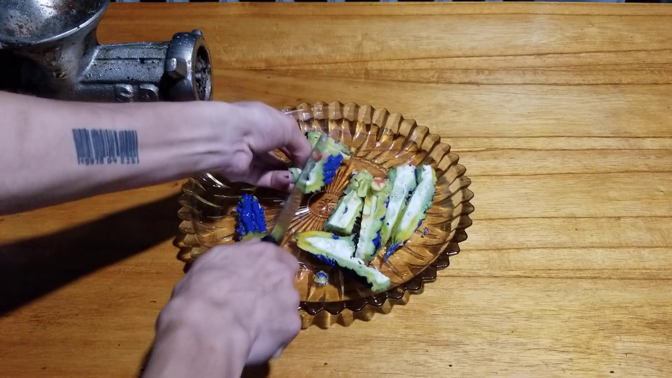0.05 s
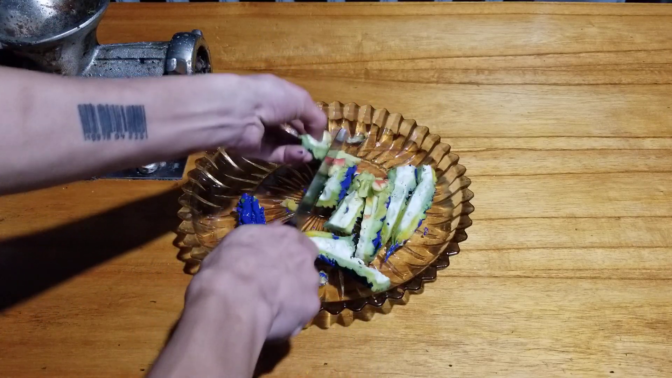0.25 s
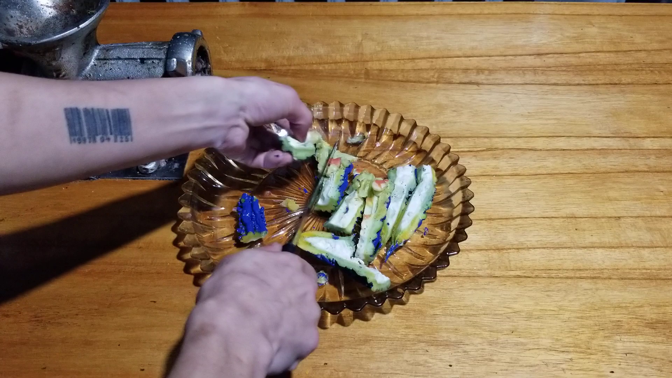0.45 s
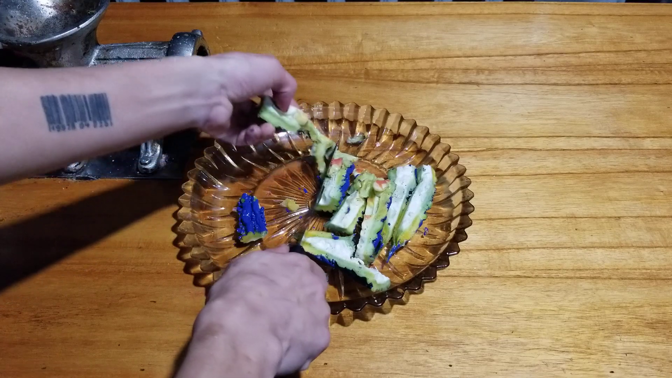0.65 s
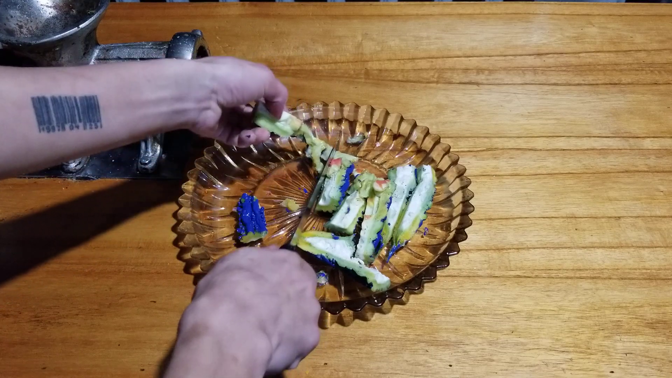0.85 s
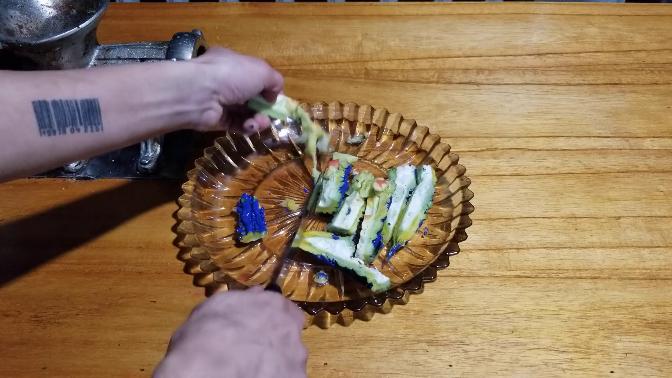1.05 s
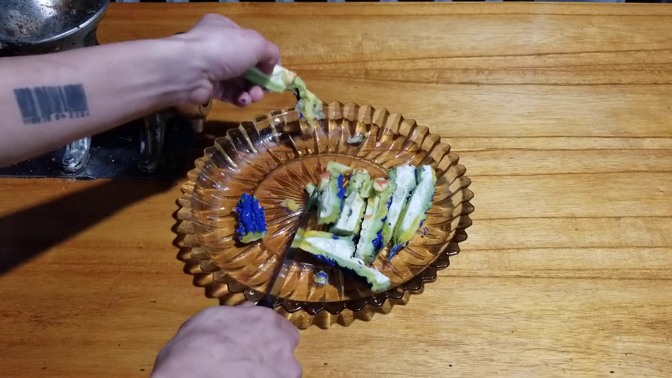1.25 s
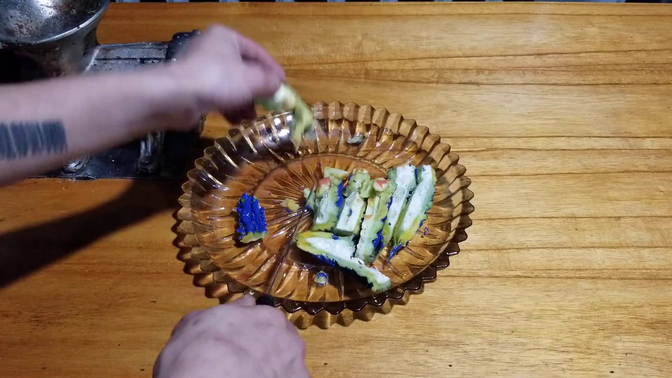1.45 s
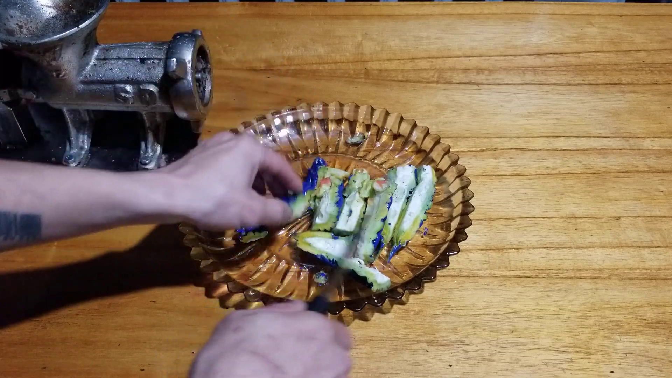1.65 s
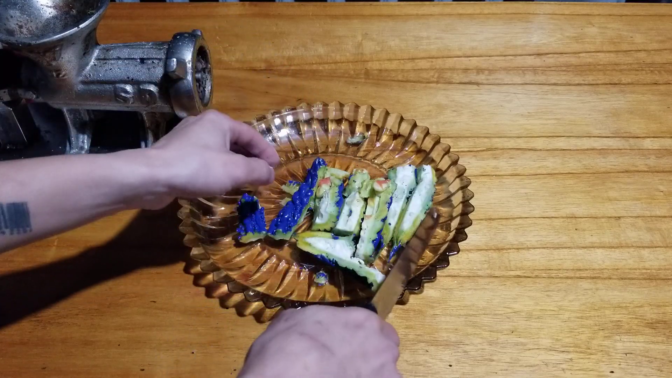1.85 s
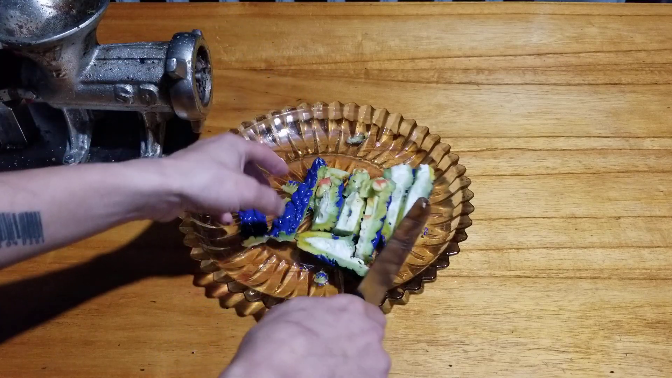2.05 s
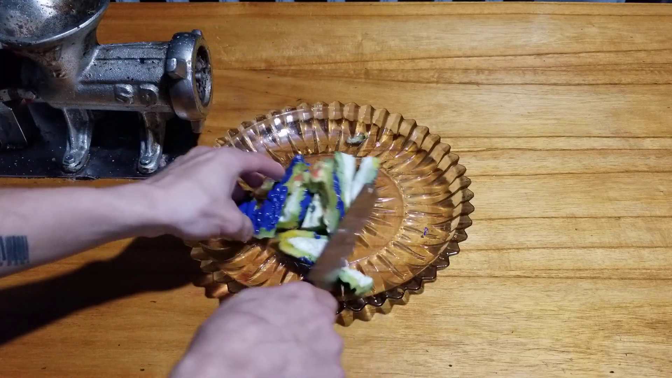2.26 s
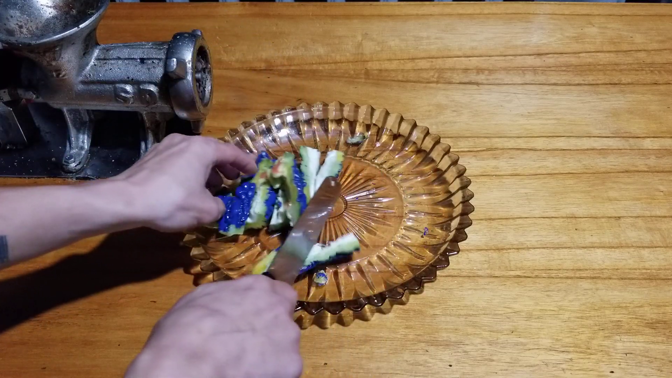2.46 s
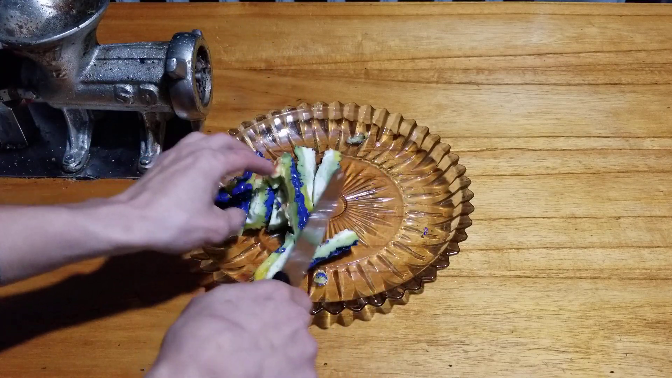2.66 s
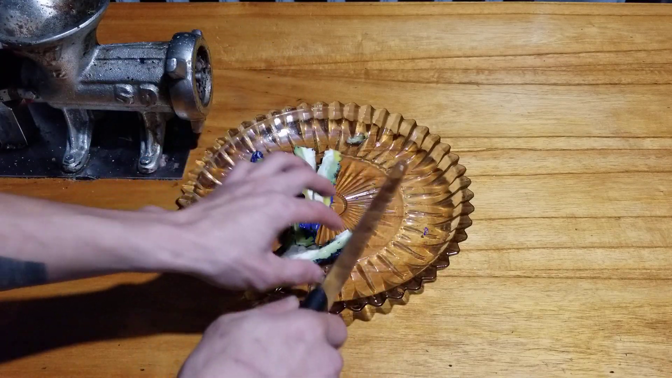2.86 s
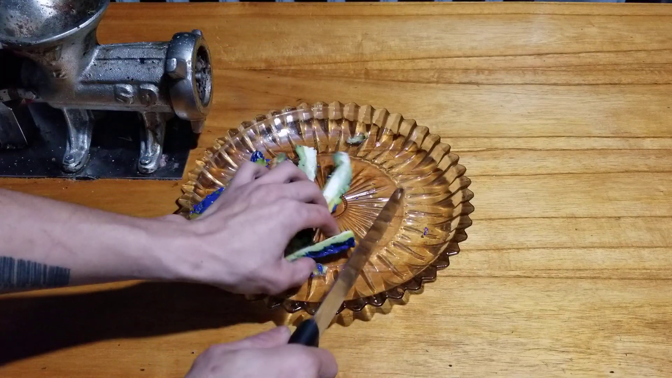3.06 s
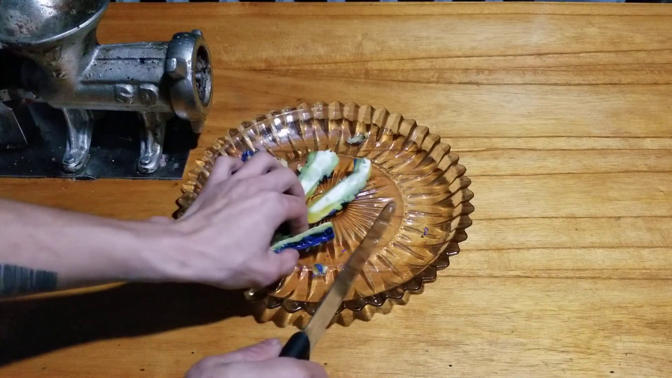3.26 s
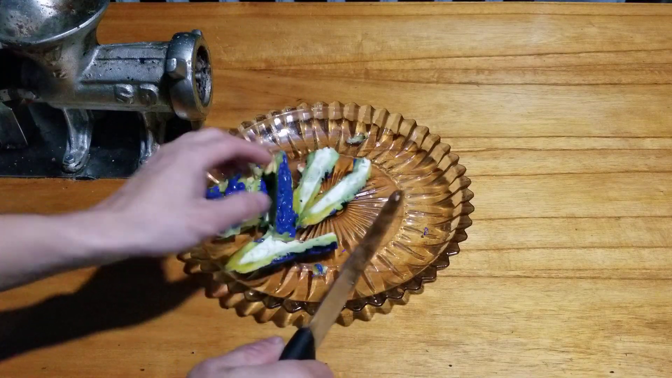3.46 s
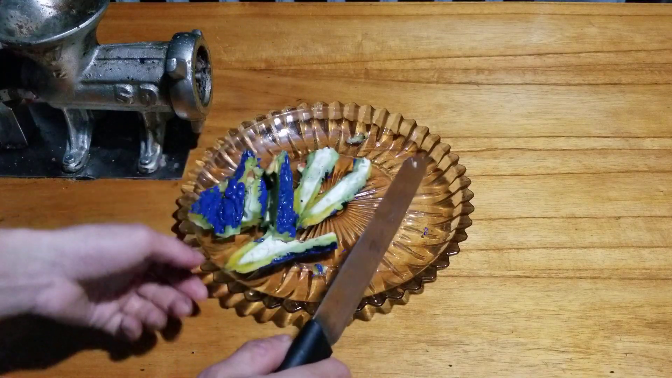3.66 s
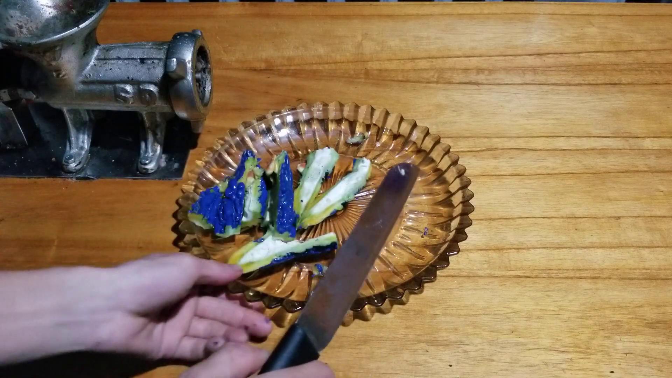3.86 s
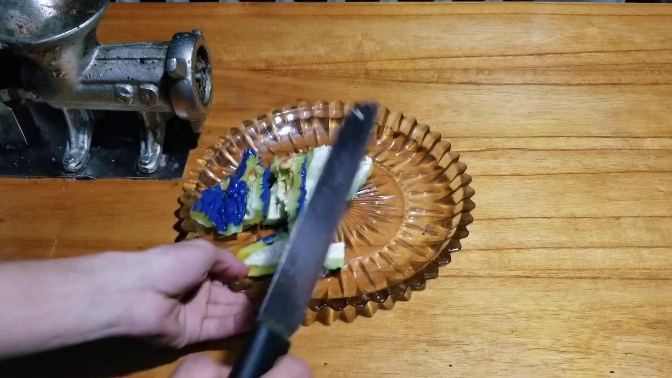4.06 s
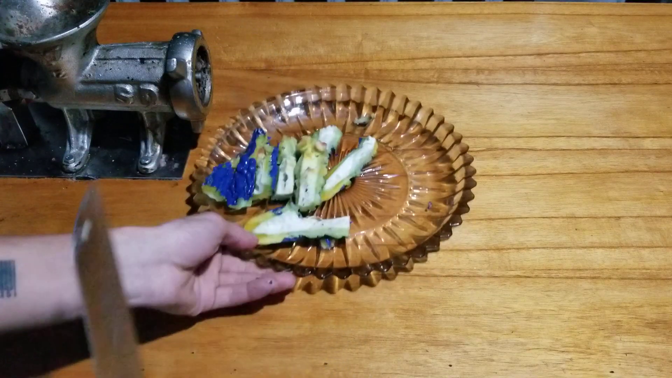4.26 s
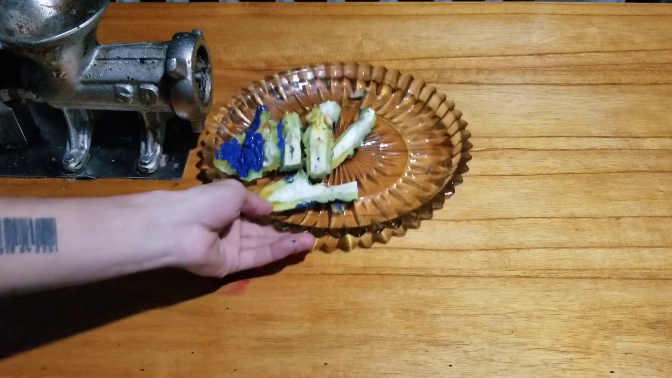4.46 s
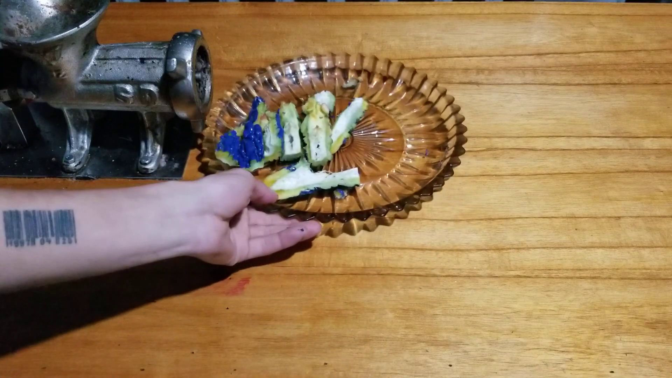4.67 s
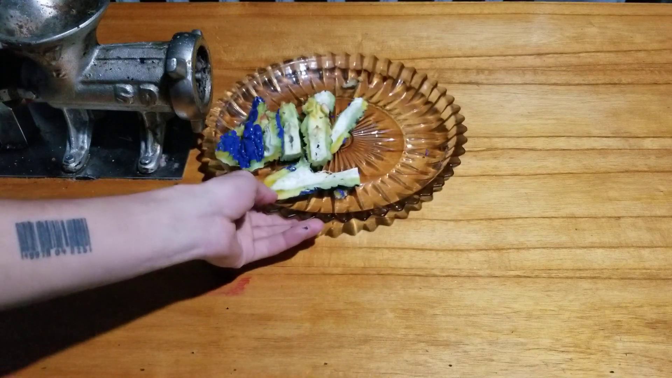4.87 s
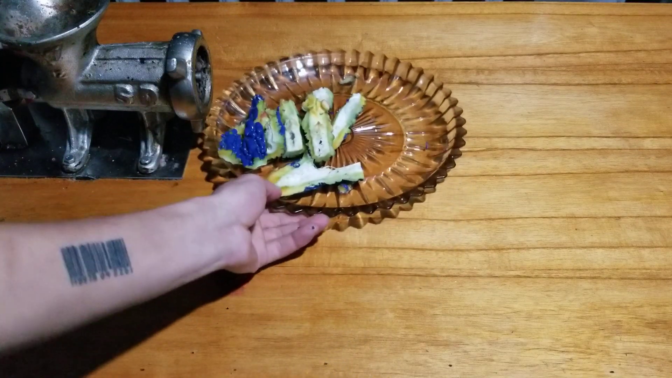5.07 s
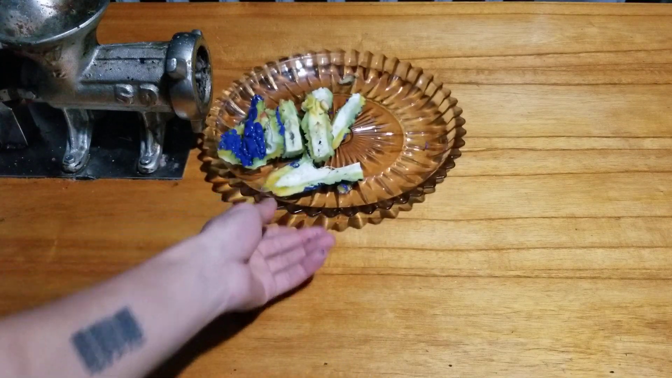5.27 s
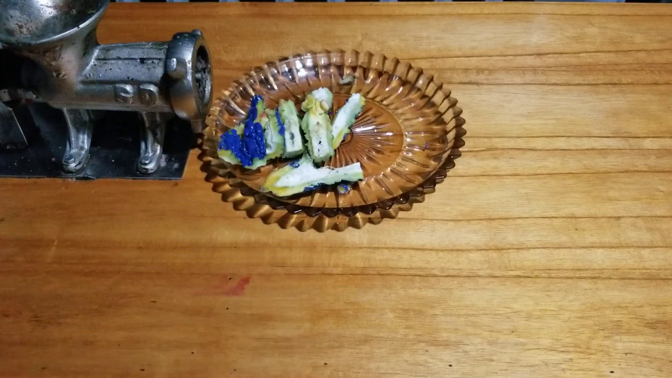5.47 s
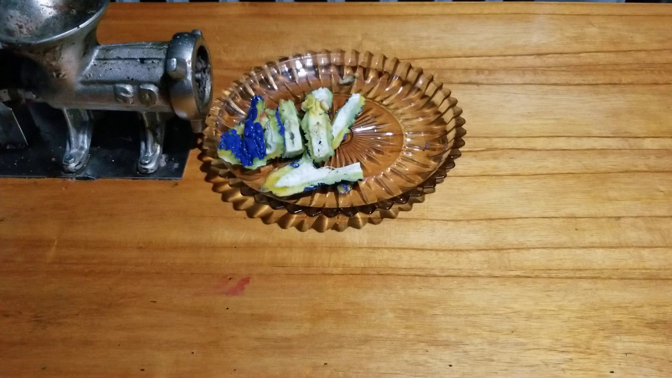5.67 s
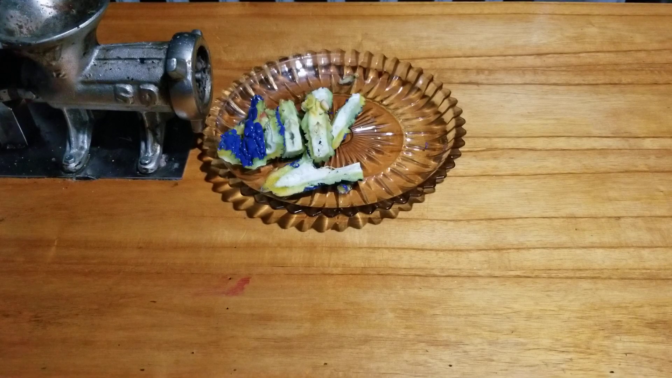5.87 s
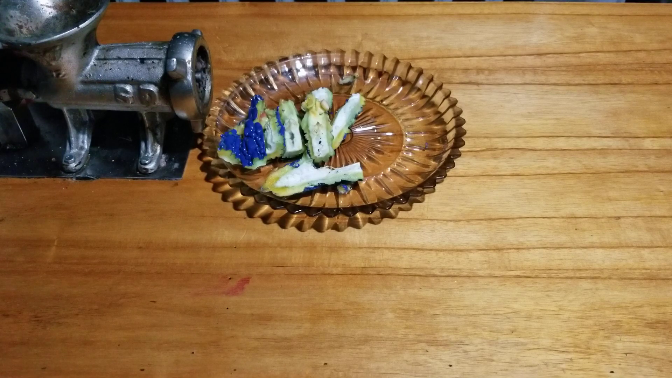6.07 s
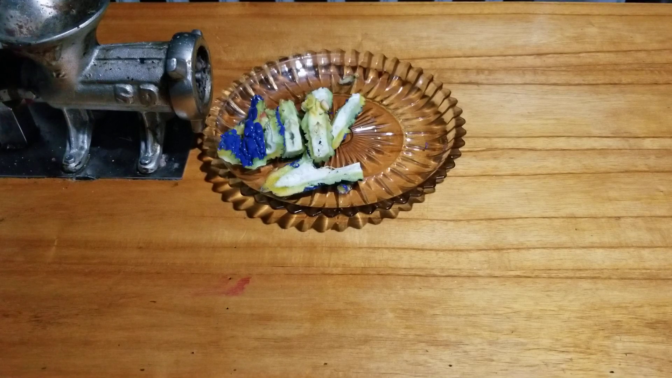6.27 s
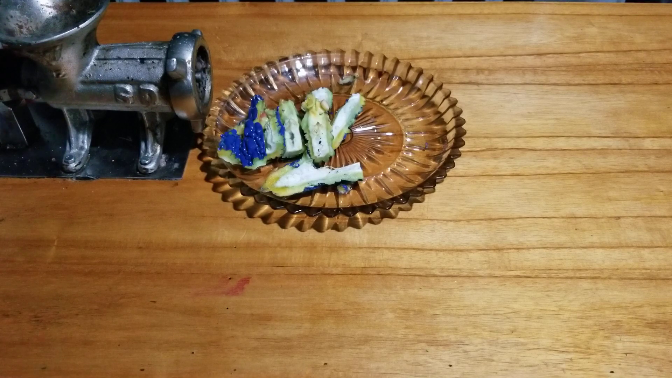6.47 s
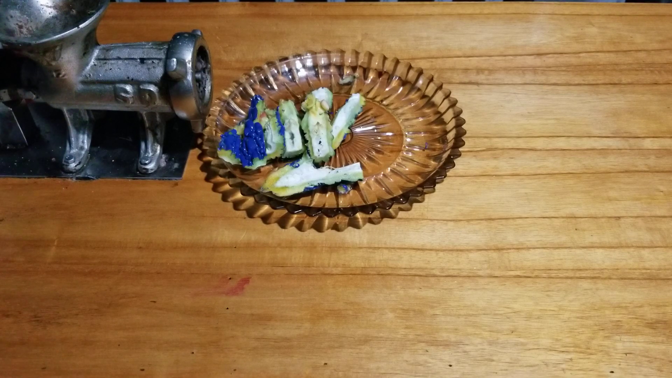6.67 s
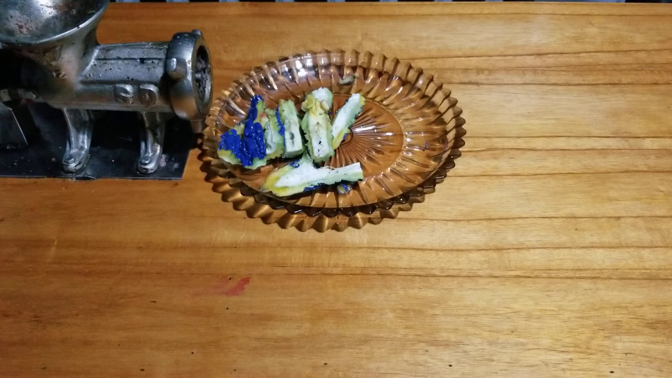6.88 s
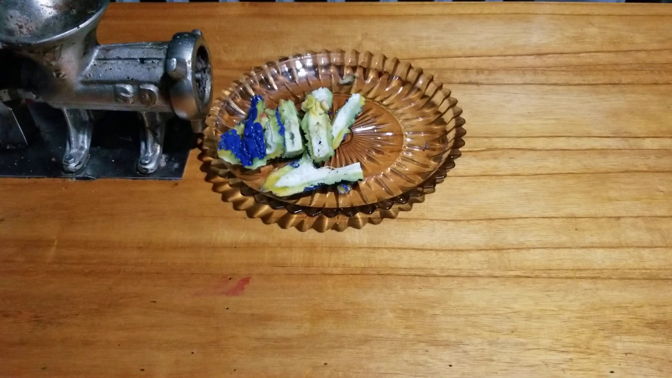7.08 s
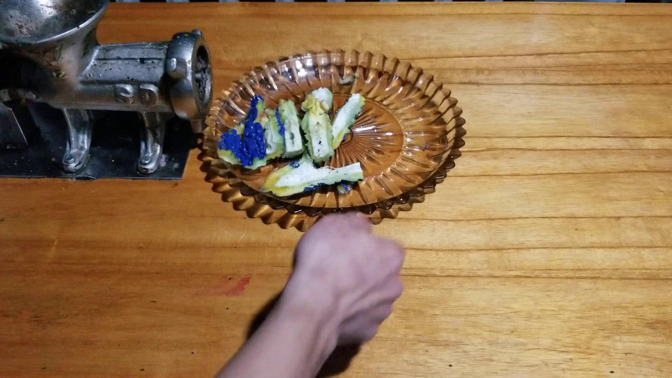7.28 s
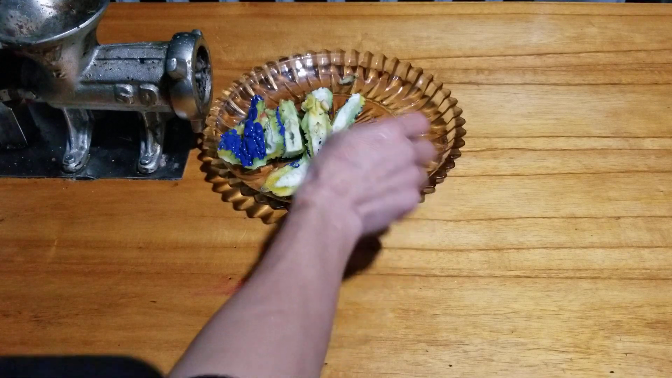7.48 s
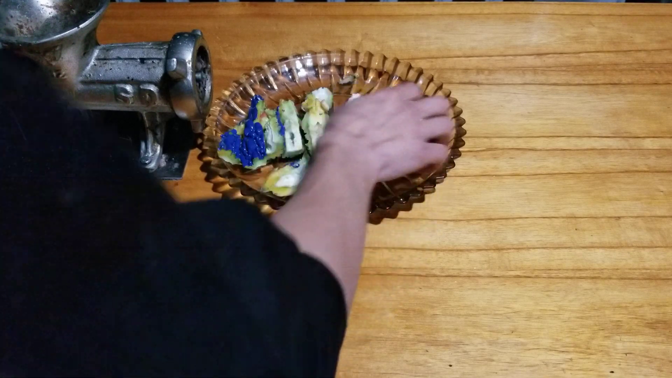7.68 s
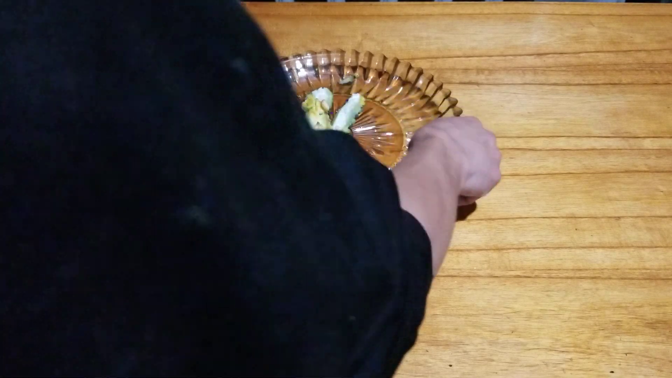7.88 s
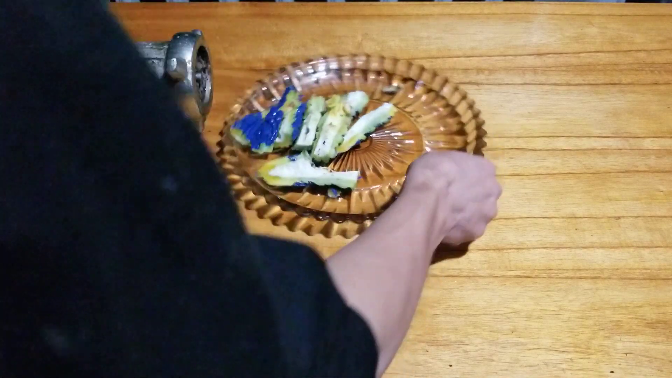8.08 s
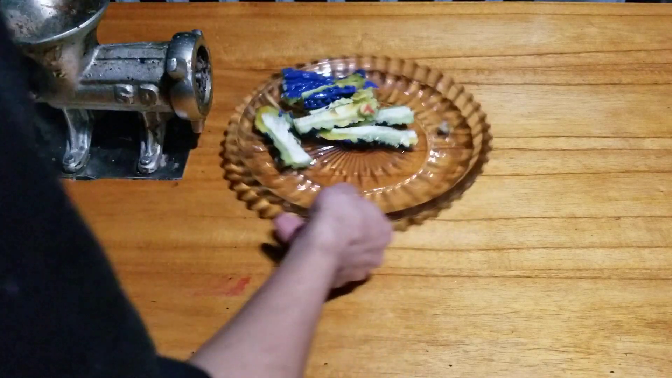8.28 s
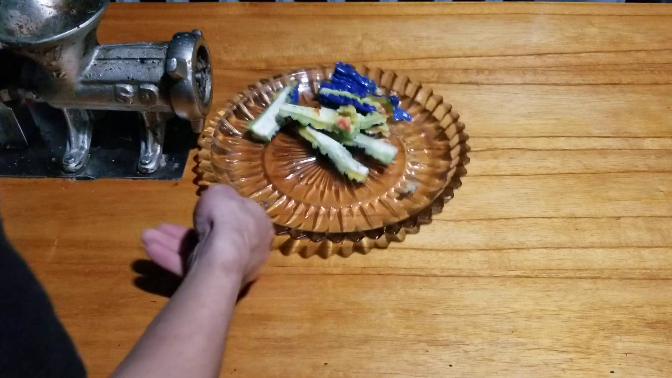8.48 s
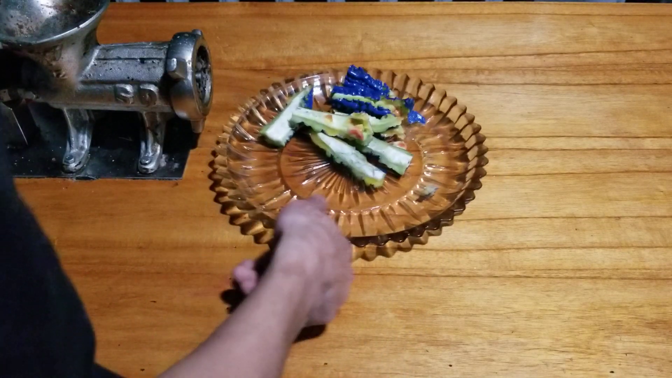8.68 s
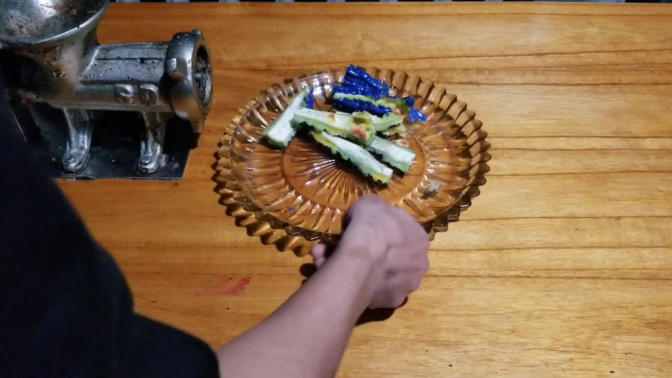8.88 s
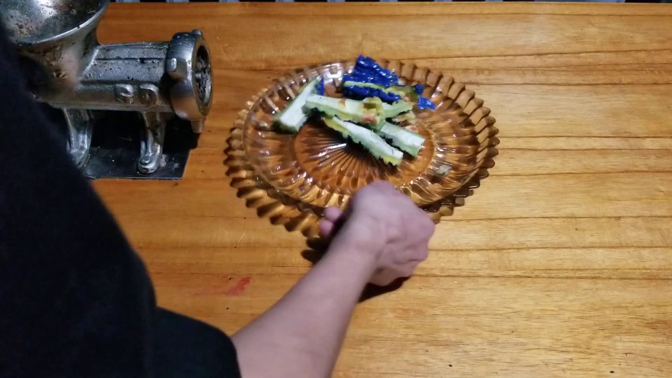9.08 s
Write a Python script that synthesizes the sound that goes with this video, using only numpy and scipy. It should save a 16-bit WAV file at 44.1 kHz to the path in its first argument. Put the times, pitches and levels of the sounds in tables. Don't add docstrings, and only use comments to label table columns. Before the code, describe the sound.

Sharp knock of blade on glass, sparse taps, plate set down, knife laid on wood, then a loud juddering plate slide over a faint fan whirr.

```python
import sys
import numpy as np
from scipy import signal
from scipy.io import wavfile
from scipy.ndimage import uniform_filter1d

SR = 44100
rng = np.random.default_rng(int(sys.argv[2]) if len(sys.argv) > 2 else 0)


def digitize_waveform(pressure):
    field = np.atleast_2d(pressure).T
    bounded = np.clip(field, -1, 1)
    quanta = np.round(bounded * 32767).astype(np.int16)
    wavfile.write(sys.argv[1], SR, quanta)


def volts_from_db(level):
    exponent = np.asarray(level, float) / 20
    return 10 ** exponent


N = 403074

# (frequency [Hz], density [dB per Hz])
WHIRR = [(41, -41.5), (70, -2.5), (113, 2.5), (200, -8.5), (320, -9.5), (800, -7), (1200, -12),
         (1900, -15.5), (3000, -5), (3570, -18), (4400, -18.5), (8200, -28), (9000, -32.5), (16000, -46)]
# (frequency [Hz], width [Hz], level [dB])
WHINES = [(137, 220, -16.5), (2020, 110, -5.5), (2890, 200, -22.5), (4007, 120, -2)]
# (time [s], level [dB])
WHISTLES = [(0.0, -7), (2.05, -6.5), (2.4, -10), (2.9, -9), (3.4, -9.5), (4.4, -3), (5.2, -10.5), (5.9, -6),
            (6.8, -5.5), (7.3, -10), (9.14, -10.5)]
# (time [s], level [dB])
RUMBLE = [(0.0, -64), (1.2, -80.5), (2.0, -66.5), (3.0, -77), (4.5, -76), (5.4, -69), (7.2, -101),
          (8.0, -62.5), (9.14, -79)]
# (frequency [Hz], correlation [1])
LIKENESS = [(60, 1), (150, 0.93), (380, 0.85), (950, -0.14), (2380, 0.14), (5980, -0.12), (15000, -0.03)]
# (frequency [Hz], left over right [dB])
LEAN = [(60, -1), (180, 4.5), (550, 3), (1650, 1.5), (4970, 4.5), (15000, 0)]
# (frequency [Hz], t60 [s])
KITCHEN = [(100, 0.93), (400, 0.29), (1500, 0.37), (4000, 0.35), (10000, 0.26), (16000, 0.36)]

# (time [s], level [dB])
RUSTLE = [(0.0, -65.5), (1.5, -65.5), (3.6, -65.5), (4.2, -63), (4.5, -56.5), (4.76, -62.5), (5.3, -59),
          (5.85, -65.5), (6.2, -56), (6.45, -59), (6.67, -64.5), (6.9, -60), (7.15, -64.5), (7.9, -63.5),
          (8.3, -58), (8.6, -56), (8.75, -75)]
# (frequency [Hz], level [dB])
CLOTH = [(600, -12.5), (1500, 2.5), (3000, 1), (5000, -4.5), (8000, -7), (9000, -15), (13000, -12.5),
         (16000, -26.5)]
# (peak time [s], level [dB], centre [Hz], breadth [octaves], fall [s])
STROKES = [(0.082, -50, 4240, 1.16, 0.054), (1.03, -69, 9000, 4.9, 0.029),
           (1.535, -55.5, 4130, 0.63, 0.049), (1.99, -79, 13000, 0.48, 0.019),
           (2.2, -64, 12800, 3.6, 0.032), (3.22, -74, 10000, 0.77, 0.048), (3.64, -49.5, 960, 0.8, 0.04),
           (3.74, -66, 5470, 0.73, 0.15), (3.8, -54, 1190, 0.41, 0.035), (4.2, -61, 11000, 0.37, 0.02),
           (5.07, -60.5, 7000, 1.4, 0.04), (5.36, -55.5, 5960, 0.49, 0.02), (5.5, -54.5, 447, 1.5, 0.089),
           (5.506, -61, 8750, 14, 0.03), (5.98, -66, 12000, 1.5, 0.038), (6.069, -56.5, 11000, 11, 0.035),
           (6.165, -46, 11900, 5.1, 0.0099), (6.73, -70, 8000, 2.1, 0.037), (7.5, -63.5, 5870, 0.83, 0.034),
           (7.9, -63.5, 6460, 0.55, 0.049), (8.02, -55, 3930, 0.45, 0.054), (8.298, -50, 6500, .2, .01),
           (8.311, -60, 13000, .6, .015), (8.355, -63, 12000, 1, .015), (8.39, -66, 12000, 1, .012),
           (8.412, -58, 11000, .5, 0.011)]

# (time [s], length [s], level [dB], frequency [Hz])
HEAVES = [(4.105, 0.038, -43, 107), (4.157, 0.014, -35, 113), (4.194, 0.051, -29.5, 120),
          (4.283, 0.019, -23, 112), (4.343, 0.022, -27, 121), (4.373, 0.012, -18.5, 128),
          (4.399, 0.025, -23.5, 112), (4.456, 0.016, -23, 130), (4.536, 0.047, -33.5, 118),
          (4.575, 0.051, -21.5, 120.2), (4.629, 0.035, -22.5, 118), (8.048, 0.019, -29, 128),
          (8.078, 0.068, -25, 125.4), (8.138, .02, -20.5, 120), (8.188, 0.017, -15, 124),
          (8.245, 0.055, -12.5, 129), (8.295, 0.073, -11.5, 124), (8.384, .04, -18, 118),
          (8.446, 0.04, -5.5, 109), (8.508, 0.056, -3.5, 116.7), (8.59, 0.16, -26.5, 121.9)]
# (time [s], force [dB])
DRAGS = [
    [(4.04, -58), (4.1, -48), (4.2, -43), (4.27, -51), (4.33, -46), (4.42, -37.5), (4.51, -50), (4.56, -27)],
    [(4.8, -50), (4.86, -66), (4.96, -50), (5.03, -57.5), (5.07, -52.5), (5.15, -72)],
    [(7.9, -51), (8.0, -48.5), (8.1, -38), (8.21, -32.5), (8.3, -19.5), (8.39, -19), (8.43, -28)],
    [(8.46, -12), (8.49, -9), (8.51, -19.5), (8.54, -21), (8.6, -54)],
    [(8.8, -43), (8.88, -67), (8.93, -46), (9.05, -66), (9.1, -44.5), (9.14, -41)],
]
DRAG_BOOM = [-23, 0, -11, -3, 6.5]
# (frequency [Hz], density [dB per Hz])
SCRATCH = [(530, -15), (900, -20), (1120, -13.5), (2170, 1), (2570, -9), (3470, -8), (3860, -14.5),
           (5040, -17), (16000, -39)]

# (frequency [Hz], level [dB], t60 [s])
BOOM = [(88, -30, .1), (108, 0, .24), (124, 0, .22), (150, -12, .08)]
# (frequency [Hz], level [dB], t60 [s])
WOOD = [(228, 0, .25), (276, -3, .09), (311, 2, .1), (347, 3, .09), (388, 1, .08), (432, 2, .06),
        (465, 1, .08), (513, -2, .09), (566, 0, .11), (678, -3, .09), (718, -5, .08), (872, -2, .07),
        (1060, -9, .05), (1268, -7, .06)]
# (frequency [Hz], level [dB], t60 [s])
HANDLE = [(503, 4, 0.15), (573, 14.5, 0.22), (972, -1, 0.44), (1040, 0, 0.17), (1110, -1, 0.22),
          (1430, -6, 0.091), (1960, -8, 0.14), (2200, 8, 0.14), (2720, 2, 0.091)]
# (frequency [Hz], level [dB], t60 [s])
BLADE = [(2110, 6, .06), (2200, 7, 0.1), (3570, 12, 0.044), (2760, 2, 0.055), (4720, 16, .13),
         (5110, 12, .06), (5640, 19, .065)]
# (frequency [Hz], level [dB], t60 [s])
GRIPPED = [(2040, 0, .09), (2200, -4, .07), (2700, 2, .06), (3570, -6, .04), (4000, -9, .04),
           (5350, -7, .06)]
# (frequency [Hz], level [dB], t60 [s])
BLADE_FINE = [(6360, 0, 0.068), (8100, -6, 0.055), (7230, -6, 0.091), (9000, -3, 0.039), (10400, -2, 0.041),
              (11300, -6, 0.18), (11650, 1, 0.044), (13000, 4, 0.03), (13900, -26.5, 0.073),
              (15300, -19, 0.079)]
# (frequency [Hz], t60 [s], level chopped [dB], level tapped on the rim [dB],
# level tapped on a rib [dB], level set down [dB], level slammed [dB])
GLASS = [(1270, .09, -9, -14, -26, -12, 1), (1875, .11, 4, 2, -16, -2, -2), (2135, .17, 1, -14, -2, -3, -2),
         (2620, .12, -12, 0, -7, -14, -6), (2870, .07, -9, -9, -14, -10, -3),
         (3080, .08, -12, 0, -16, 4, 3), (3200, .08, -10, -10, -16, 1, -3),
         (3390, .17, 0, -14, -8, -10, -7), (3640, .07, 2, -14, 2, -5, -1),
         (4300, .08, -12, -18, -20, -6, 0), (4960, .17, 3, -12, -20, -16, -14),
         (5230, .13, 0, -16, -20, -14, -14), (5570, .07, -22, -6, -18, -2, -14),
         (6830, .12, -6, -20, -20, -15, -17)]
# (frequency [Hz], level [dB], t60 [s])
GLASS_FINE = [(5870, -64, 0.052), (6250, -5.5, 0.04), (7180, -5, 0.078), (8125, -2, .08),
              (8740, -4.5, 0.05), (9620, -12, .05), (10400, -10, 0.059), (11700, -2.5, 0.039),
              (13100, -4, 0.043), (14200, -6, 0.07), (15160, -7, 0.034)]

# (time [s], tick [dB], table
# boom [dB], wood knock [dB], knock pitch [Hz])
BUMPS = [(3.7728, -37.5, -70, -27.5, 1460), (3.774, -60, -70, -36, 517), (4.2872, -67, -50, -20.5, 342),
         (4.3982, -47, -50, -27.5, 340), (4.418, -66, -50, -32, 395), (4.4805, -50, -30, -38, 840),
         (5.0968, -62, -70, -44, 1600), (5.972, -70, -60, -39, 278), (7.8194, -55, -70, -32.5, 224),
         (7.8414, -49, -18.5, -19.5, 226), (7.843, -60, -58, -34, 792), (8.014, -44, -50, -30, 353),
         (8.0387, -48, -51, -18, 374), (8.1165, -42, -54, -23, 303), (8.135, -59, -54, -22, 214),
         (8.1845, -43.5, -50, -16, 415), (8.185, -60, -57, -22, 870), (8.205, -63, -58, -10.5, 224),
         (8.2408, -40, -46, -10, 523), (8.2415, -60, -60, -23, 900), (8.262, -60, -53, -8, 318),
         (8.285, -36, -60, -11, 410), (8.318, -60, -57, -13, 290), (8.303, -54, -50.5, -7, 230),
         (8.331, -32, -50, -6.5, 484), (8.349, -45, -53, -7.5, 300), (8.367, -46, -53, -9.5, 514),
         (8.388, -32, -52, -6.5, 314), (8.402, -45, -33.5, -27, 500), (8.62, -48, -48, -28, 283),
         (8.9713, -55, -26, -27, 386)]
# (time [s], tick [dB], table boom [dB], wood knock [dB], knock pitch [Hz])
TICKS = [(3.6179, -50, -58, -49, 516), (4.1882, -36, -50, -25, 326), (4.19, -60, -60, -38, 900),
         (4.738, -52, -73, -70, 300), (5.0748, -39, -58, -65, 250), (8.1632, -46, -70, -39, 302),
         (8.2955, -39, -70, -26, 880), (8.3064, -38, -70, -30, 710), (8.352, -45, -70, -26, 466),
         (8.3712, -46, -68, -30, 845), (8.411, -44, -70, -31, 840)]
# (time [s], blade [dB], table boom [dB], handle knock [dB], knock pitch [Hz])
CLINKS = [
    (5.9645, -31.5, -29, -32, 984),
    (6.045, -60, -56.5, -40, 584),
    (6.101, -64, -60.5, -44, 583),
    (6.166, -50, -50, -33, 1110),
    (6.181, -37, -70, -40, 2200),
]
# (time [s], blade [dB], table boom [dB], wood knock [dB], knock pitch [Hz])
CLATTER = [(6.1414, -45, -35, -24.5, 573), (6.1485, -36.5, -44, -21, 298), (6.2679, -25, -55, -23.5, 640),
           (6.277, -52, -51, -14, 319), (6.283, -42, -25, -18.5, 1360), (6.2988, -23, -19.5, -16.5, 574),
           (6.311, -32, -54, -22.5, 680), (6.331, -53, -48, -26.5, 370)]
# (time [s], blade [dB], table boom [dB], wood knock [dB], knock pitch [Hz])
SLAP = [
    (6.2753, -14, -25.5, -12.5, 1004),
]
# (time [s], glass [dB], table boom [dB], wood knock [dB], knock pitch [Hz])
SET_DOWNS = [
    (4.574, -15.5, -13, -13, 373),
    (4.577, -55, -60, -22, 1180),
    (5.181, -35, -19.5, -25.5, 307),
    (5.183, -56, -60, -38.5, 893),
    (5.184, -60, -60, -32.5, 1280),
]
# (time [s], glass [dB], table boom [dB], wood knock [dB], knock pitch [Hz])
SLAMS = [(8.4441, -3.5, -34, -7.5, 342), (8.456, -7.5, -32, -1.5, 420), (8.468, -10, -34, -6.5, 290),
         (8.482, -26, -33, -13, 470), (8.4996, -6.5, -24, -7, 674), (8.504, -13, -34, -6, 870),
         (8.5149, -11, -32, -4, 297), (8.527, -24, -34, -7, 315), (8.538, -16, -42, -11, 700),
         (8.548, -24, -46, -21, 397), (8.562, -22, -45, -28, 710), (8.585, -27, -45, -28.5, 935)]
# (time [s], glass [dB], table boom [dB], wood knock [dB], knock pitch [Hz])
RIB_TAPS = [
    (0.9992, -41, -42, -41, 370),
    (2.007, -40, -38, -40, 650),
    (2.1614, -28.5, -31, -52, 400),
]
# (time [s], glass [dB], table boom [dB], wood knock [dB], knock pitch [Hz])
RIM_TAPS = [
    (1.8955, -30, -26.5, -30, 482),
    (1.978, -50, -48, -65, 202),
    (2.971, -59, -37.5, -44.5, 276),
]
# (time [s], glass [dB], table boom [dB], wood knock [dB], knock pitch [Hz])
CHOPS = [
    (0.0998, -4, -19, -16, 317),
    (0.106, -37, -49, -18.5, 240),
    (0.108, -47, -60, -26, 780),
]
# (time [s], depth [dB])
DUCKS = [
    (0.1, 6.5),
    (8.45, 2),
]


def evened(x):
    return x / np.sqrt(np.mean(x ** 2) + 1e-20)


def read(points, hz):
    f, value = np.transpose(points)
    return np.interp(np.log(hz + 1), np.log(f + 1), value)


def curve(rows, t):
    s, value = np.transpose(rows)
    return np.interp(t, s, value)


def add(mix, s, sound, pan_db=0):
    part = mix[:, round(s * SR):][:, :len(sound)]
    sides = np.array([[.5], [-.5]])[:len(mix)]
    part += volts_from_db(sides * pan_db) * sound[:part.shape[1]]


def noise(db_field, patchy_db):
    hz = np.fft.rfftfreq(1024, 1 / SR)[:, None]
    t = np.arange(N // 256 + 5) * 256 / SR
    a, b, c, d, patches = rng.standard_normal((len(t), 513, 5)).T
    patches = uniform_filter1d(patches, size=12, axis=0)
    patches = evened(uniform_filter1d(patches, size=8, axis=1))
    same = np.clip(read(LIKENESS, hz), -1, 1)
    left = a + 1j * b
    right = same * left + np.sqrt(1 - same ** 2) * (c + 1j * d)
    balance_db = np.array([.5, -.5])[:, None, None] * read(LEAN, hz)
    z = np.array([left, right]) * volts_from_db(balance_db + db_field(hz, t) + patchy_db * patches)
    return signal.istft(z, nperseg=1024, noverlap=768)[1][:, :N]


def room_noise():
    def field(hz, t):
        whistles = sum(volts_from_db(db + 24.5) ** 2 / (1 + (2 * (hz - f) / width) ** 2) ** 2 for f, width, db in WHINES)
        whirr = volts_from_db(read(WHIRR, hz) - 67.5) ** 2
        whirr = whirr * (1 + whistles * volts_from_db(curve(WHISTLES, t)) ** 2)
        low_pass = 1 / (1 + (hz / 65) ** 8)
        high_pass = (hz ** 2 / (hz ** 2 + 35 ** 2)) ** 2
        hum = 1 + 3.6 / (1 + ((hz - 40) / 8) ** 2)
        rumble = volts_from_db(curve(RUMBLE, t) + 5.0) ** 2 * low_pass * high_pass * hum
        return 10 * np.log10(whirr + rumble + 1e-30)
    return noise(field, 2.42)


def kitchen(x):
    taps = np.zeros((2, SR // 2))
    at = np.arange(160, SR // 2 - 20, 20)
    at = at + rng.integers(0, 20, (2, len(at)))
    np.put_along_axis(taps, at, rng.choice([-1., 1.], at.shape), 1)
    hz, t, z = signal.stft(taps, SR, nperseg=512)
    alike = np.clip(np.log2(1100 / (hz[:, None] + 1)) / 2.16, 0, 1)
    z = alike * z[0] + np.sqrt(1 - alike ** 2) * z
    tail = signal.istft(z * volts_from_db(-60 * t / read(KITCHEN, hz)[:, None]), SR, nperseg=512)[1]
    tail = signal.sosfilt(signal.butter(2, 270, "high", fs=SR, output="sos"), tail)
    return signal.fftconvolve(x.mean(0)[None], tail / np.linalg.norm(tail[0]), axes=1)[:, :N]


def rustle():
    rise_share = 0.34
    def field(hz, t):
        power = volts_from_db(read(CLOTH, hz) + curve(RUSTLE, t)) ** 2
        for s, db, centre_hz, octaves, fall in STROKES:
            rising = ((t - s) / (rise_share * fall)) ** 2
            swell = np.exp(-np.where(t < s, rising, (t - s) / fall))
            band = np.exp(-(np.log2((hz + 1) / centre_hz) / octaves) ** 2)
            power = power + volts_from_db(db) ** 2 * swell * band
        return 10 * np.log10(power) + 2.5 * rng.standard_normal(len(t))
    return volts_from_db(-15.5) * noise(field, 1.5)


def ring(modes, spread_db=0, damping=1.0, near_hz=None):
    hz, db, t60 = np.transpose(modes)[:, :, None]
    t = np.arange(SR // 2) / SR
    luck = rng.standard_normal((2, len(modes), 1))
    db = db + spread_db * luck[0]
    if near_hz:
        db = db - 17.8 * abs(np.log2(hz / near_hz))
    lead = luck[1] * np.minimum(hz / 2500, 1)
    decay = volts_from_db(db - 60 * t / (damping * t60))
    x = (decay * np.sin(2 * np.pi * hz * t + lead)).sum(0)
    return x / abs(x).max()


def crack(low_hz, high_hz, t60):
    t = np.arange(SR // 10) / SR
    band = signal.butter(3, [low_hz, min(high_hz, 20000)], "band", fs=SR, output="sos")
    x = signal.sosfilt(band, rng.standard_normal(len(t)) * volts_from_db(-60 * t / t60))
    return np.pad(x / abs(x).max(), (0, SR // 2 - len(t)))


def heaves():
    rise_s, sag_db, fall_s, lead_s = .009, -7, .011, .012
    out, t = np.zeros((2, N)), np.arange(SR // 4) / SR
    for s, length, db, hz in HEAVES:
        shape = 1 - np.exp(-(t / rise_s) ** 2)
        shape = shape * np.exp(-np.maximum(t - length, 0) / fall_s)
        add(out, s - lead_s, volts_from_db(db + sag_db * t / length) * shape * np.sin(2 * np.pi * hz * t), .6)
    return out


def drags():
    judder_db, grit_db = -4, -17.5
    grit_growth, full_force_db = 1.36, -5
    out = np.zeros((2, N))
    colour = np.roll(np.fft.irfft(volts_from_db(read(SCRATCH, np.fft.rfftfreq(512, 1 / SR)))), 256)
    for rows, boom_db in zip(DRAGS, DRAG_BOOM):
        start = rows[0][0]
        t = np.arange(start, rows[-1][0], 1 / SR)
        force_db = curve(rows, t)
        scratch_db = full_force_db + grit_growth * (force_db - full_force_db) + grit_db
        fade = signal.windows.tukey(len(t), .1)
        slips = (rng.random(len(t)) < 260 / SR) * rng.standard_normal(len(t))
        slips = slips * volts_from_db(rng.exponential(1, len(t)))
        slips = fade * slips / np.sqrt(uniform_filter1d(slips ** 2, size=3000) + 1e-9)
        bunching = 0.33 + 2 * uniform_filter1d(abs(slips), size=150)
        grit = signal.oaconvolve(rng.standard_normal(len(t)) * bunching, colour, "same")
        boom, wood = ring(BOOM, 1, .8), ring(WOOD, 1, .4)
        boom, wood = boom / np.linalg.norm(boom), wood / np.linalg.norm(wood)
        add(out, start, signal.oaconvolve(slips * volts_from_db(force_db + boom_db), boom), .6)
        add(out, start, signal.oaconvolve(slips * volts_from_db(force_db + judder_db), wood), 1.5)
        add(out, start, volts_from_db(scratch_db) * fade * evened(grit), 3.0)
    return out


def hits(rows, body, fine, wood, ring_share, thud_share, damping, pan_db, edge_db, knock_db=-9.0):
    boom_rise_s, wood_rise_s, knock_s = 0.0089, .002, 0.0024
    out = np.zeros((2, N))
    share, thud = np.clip([ring_share, thud_share], .1, .8)
    t = np.arange(SR // 2) / SR
    boom_swing = 1 - np.exp(-t / boom_rise_s)
    wood_swing = 1 - np.exp(-t / wood_rise_s)
    for s, body_db, boom_db, wood_db, knock_hz in rows:
        snap = crack(1100, 3330, .024)
        snap = snap + volts_from_db(edge_db) * crack(5100, 21000, .042)
        snap = snap + volts_from_db(-3) * crack(650, 3800, .004)
        add(out, s, volts_from_db(body_db) * (1 - share) * snap, pan_db)
        for port, side in zip(out, (.5, -.5)):
            tones = ring(body, 1.3, damping) + volts_from_db(edge_db) * ring(fine, 0.67, damping)
            add(port[None], s, share * volts_from_db(body_db + side * pan_db) * tones)
        loaded = np.array(wood) * [1 + .015 * rng.standard_normal(), 1, 1]
        low = (1 - thud) * ring(loaded, 3.8, near_hz=knock_hz)
        low = low + thud * crack(.5 * knock_hz, 2.0 * knock_hz, 0.083)
        pulse = t / knock_s * np.exp(1 - t / knock_s)
        low = low + volts_from_db(knock_db) * pulse * np.sin(2 * np.pi * knock_hz * t)
        boom = volts_from_db(boom_db) * ring(BOOM, 2.5) * boom_swing
        add(out, s, volts_from_db(wood_db) * low * wood_swing + boom, 1.2)
    return out


def bumps_and_ticks():
    ticks = hits(TICKS, BLADE, GLASS_FINE, WOOD, 0.14, 0.33, damping=0.45, pan_db=5, edge_db=-6.5)
    return ticks + hits(BUMPS, BLADE, GLASS_FINE, WOOD, 0.053, 0.29, damping=0.33, pan_db=23.5, edge_db=-26)


def knife():
    out = hits(CLINKS, GRIPPED, BLADE_FINE, HANDLE, 0.8, 0.3, damping=1.0, pan_db=-8.5, edge_db=-8.5,
               knock_db=-19.5)
    out += hits(CLATTER, BLADE, BLADE_FINE, WOOD, 0.67, 0.27, damping=1.0, pan_db=-7.5, edge_db=6.0)
    return out + hits(SLAP, GRIPPED, BLADE_FINE, WOOD, 0.19, .8, damping=.5, pan_db=6, edge_db=-18)


def plate(rows, order, ring_share, damping, thud_share, edge_db):
    modes = np.array(GLASS)[:, [0, 2 + order, 1]]
    twins = modes * [1.011, 1, 1] + [0, -8, 0]
    pairs = np.vstack([modes, twins])
    return hits(rows, pairs, GLASS_FINE, WOOD, ring_share, thud_share, damping, 13.7, edge_db)


def radiate(x):
    return signal.sosfilt(signal.butter(6, 88, "high", fs=SR, output="sos"), x)


def camera_gain_db(t):
    sink_s, hold_s, recover_s = 0.55, 0.46, 0.55
    turns = np.cumsum([0, sink_s, hold_s, recover_s])
    return -sum(depth_db * np.interp(t - s, turns, [0, 1, 1, 0]) for s, depth_db in DUCKS)


def scene():
    background = room_noise() + rustle()
    pushed = drags() + bumps_and_ticks()
    pushed += plate(SLAMS, order=4, ring_share=.55, damping=.4, thud_share=.7, edge_db=-27)
    handled = knife()
    laid = plate(SET_DOWNS, order=3, ring_share=.78, damping=.25, thud_share=.55, edge_db=-30)
    taps = plate(RIB_TAPS, order=2, ring_share=0.88, damping=0.67, thud_share=0.15, edge_db=-8.5)
    taps += plate(RIM_TAPS, order=1, ring_share=0.53, damping=1.0, thud_share=0.46, edge_db=0.5)
    chop = plate(CHOPS, order=0, ring_share=1.0, damping=0.35, thud_share=0.84, edge_db=-17.5)
    echoes = kitchen(chop + taps)
    echoes += kitchen(volts_from_db(-1.5) * pushed + volts_from_db(-2.0) * laid)
    echoes += volts_from_db(-1.0) * kitchen(handled)
    return radiate(chop + taps + laid + pushed + handled + echoes + heaves()) + background


def top_cut(x):
    return signal.sosfilt(signal.butter(12, 17010, fs=SR, output="sos"), x)


def record(dry):
    turned = dry * volts_from_db(camera_gain_db(np.arange(N) / SR))
    held = turned / (1 + (turned / .97) ** 6) ** (1 / 6)
    edge = signal.firwin(401, 16120, window=("kaiser", 7), fs=SR)[None]
    mix = signal.oaconvolve(held, edge, "same")
    return top_cut(mix)


dry = scene()
out = record(dry)
digitize_waveform(out)
```